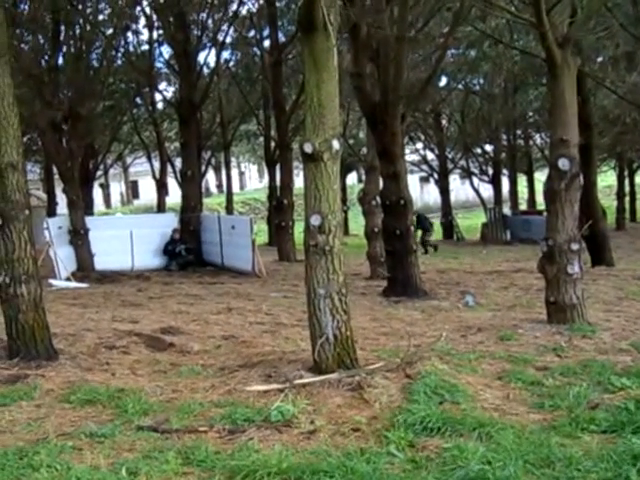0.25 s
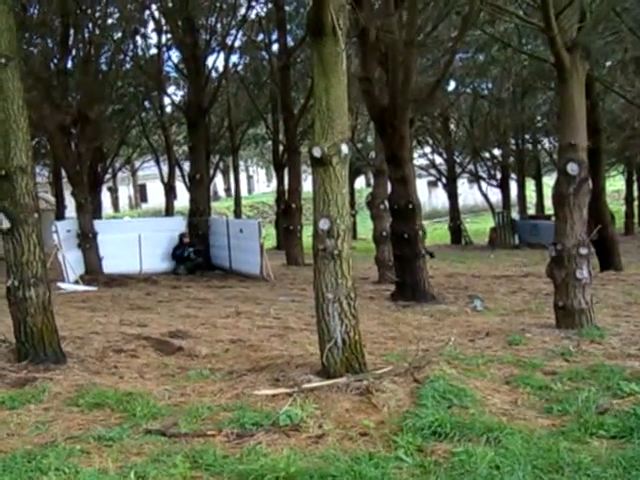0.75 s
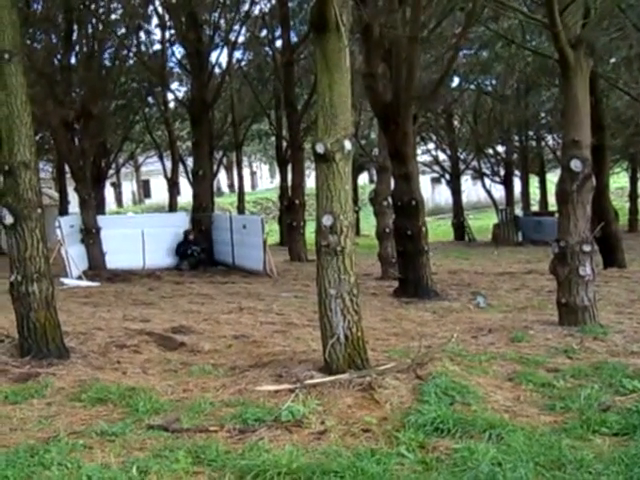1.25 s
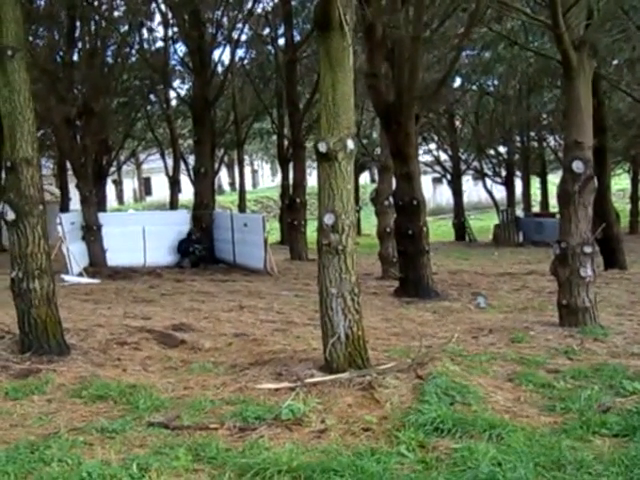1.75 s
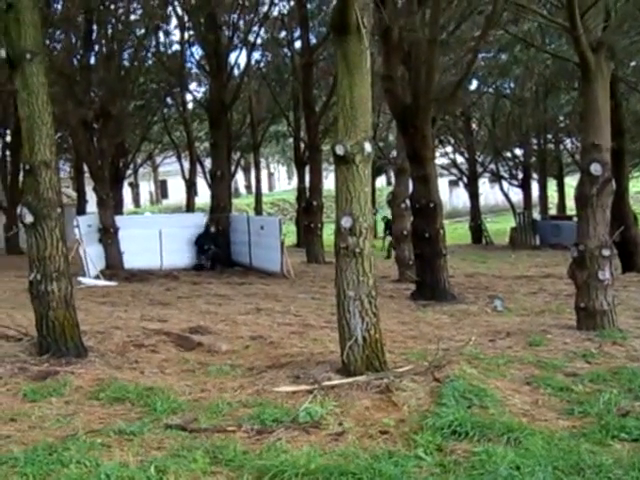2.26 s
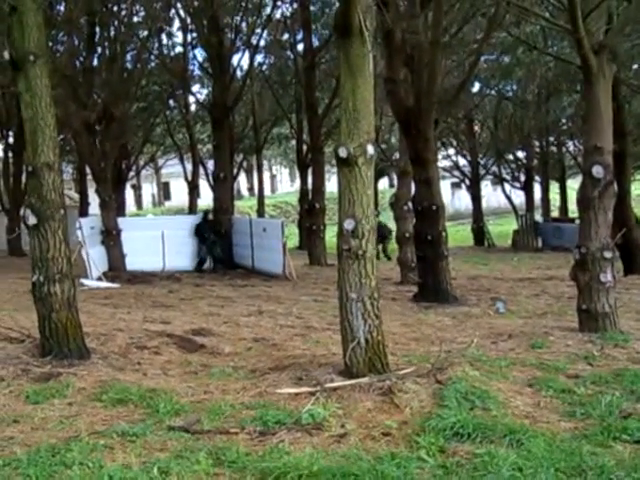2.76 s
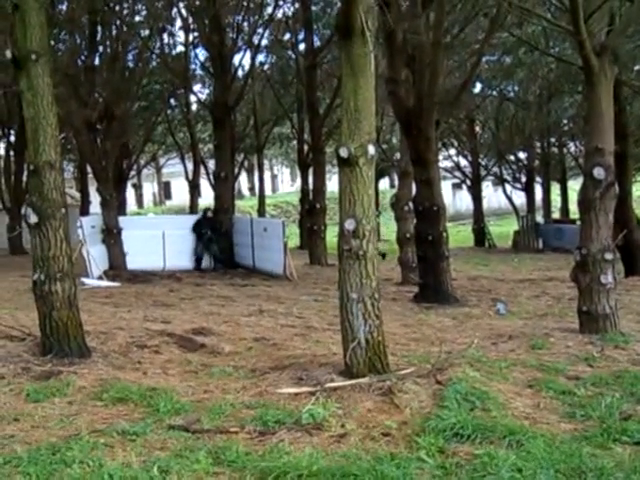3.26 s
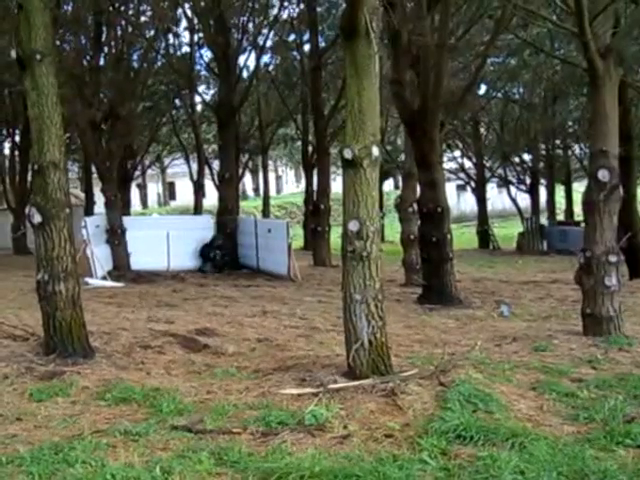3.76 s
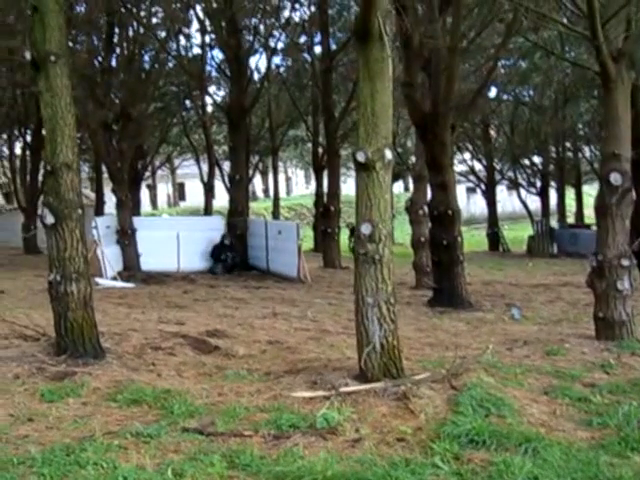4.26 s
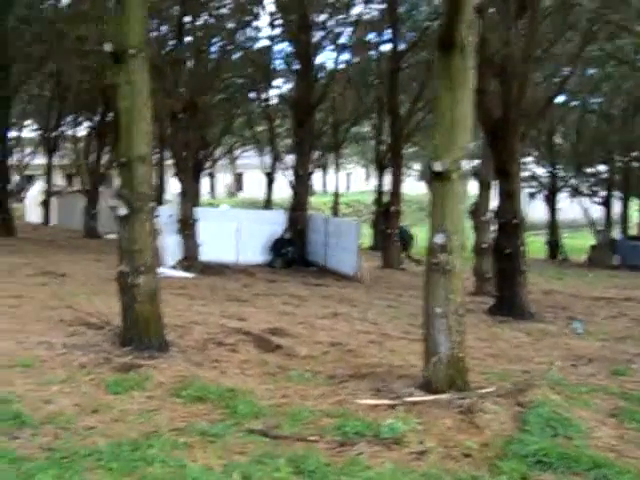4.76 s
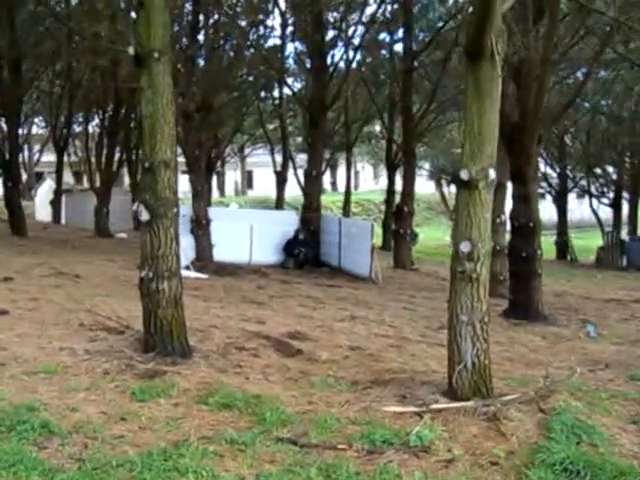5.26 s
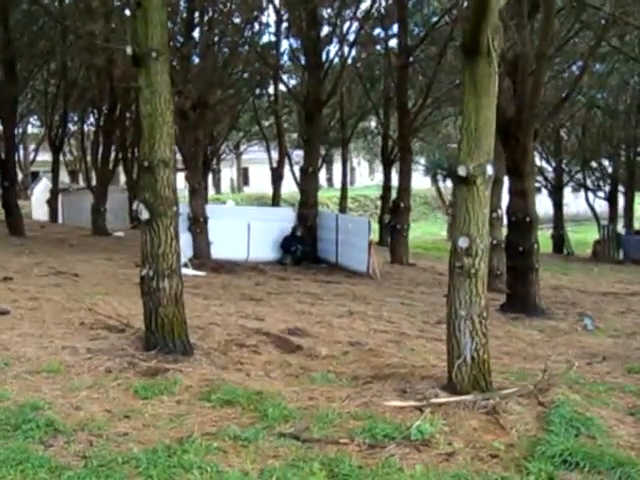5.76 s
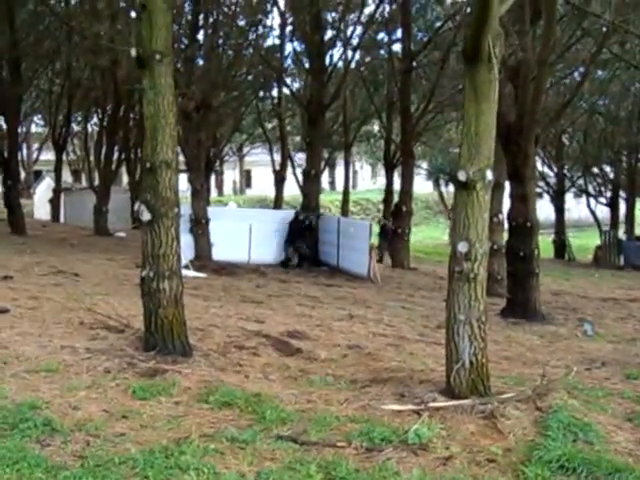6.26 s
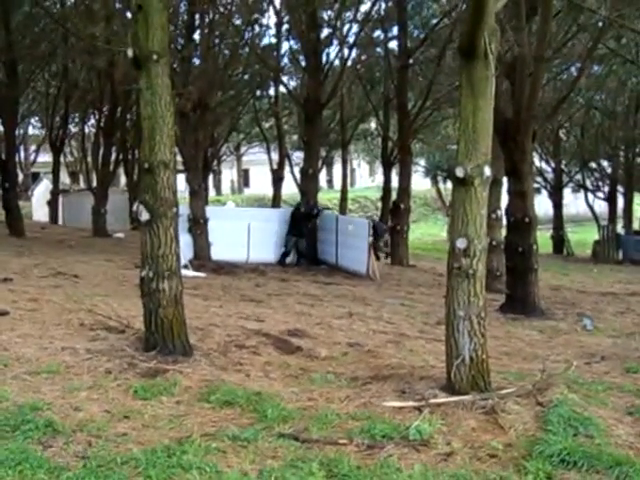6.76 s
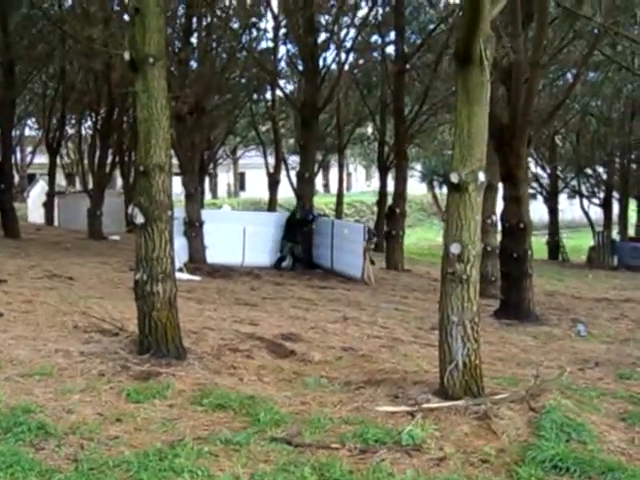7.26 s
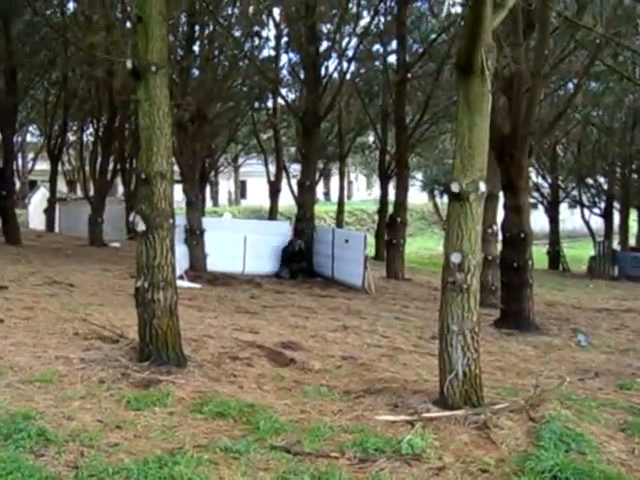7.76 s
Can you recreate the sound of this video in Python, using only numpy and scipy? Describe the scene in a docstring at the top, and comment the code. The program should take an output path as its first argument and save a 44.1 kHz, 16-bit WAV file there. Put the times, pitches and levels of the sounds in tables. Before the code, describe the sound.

Bursts of sharp airsoft pellet cracks strike close by among echoing trees, over heavy wind buffeting, then a nearer gun joins with pops and rasping gearbox.

```python
"""An airsoft skirmish in a pine wood, with gusts buffeting the microphone over a distant hush and a thin whine.
From the start pellets from a far electric gun, about twelve a second in a burst, strike close by: noise
snaps make a crack and a duller clack, thrown back by the trunks. The gun's faint report comes a flight time
before each strike, over a gearbox whirr of grainy noise. The gusts, noise that brightens with level, weaken
midway; late on a nearer gun adds full-bodied pops and a rasping gearbox, and the hush swells and sinks away."""
import sys
import numpy as np
from scipy import signal
from scipy.fft import rfft, irfft, next_fast_len
from scipy.io import wavfile
from scipy.ndimage import uniform_filter1d

SR = 44100
rng = np.random.default_rng(int(sys.argv[2]) if len(sys.argv) > 2 else 0)


def transcribe(u):
    """Save the signal u as a 16-bit wav file named by the first command-line argument.

    u: samples, shape (n,) or (channels, n), limited to [-1, 1]; the rate is SR.
    q: integer samples, one column per channel.
    """
    v = np.clip(np.atleast_2d(u).T, -1, 1)
    q = np.round(v * 32767).astype(np.int16)
    wavfile.write(sys.argv[1], SR, q)


N = 353196
T = np.arange(N) / SR  # seconds

# Pellets striking close by. Each row: time in seconds, crack level in dB over 1 ms, centre of its tone in Hz,
# clack level in dB over 1 ms, lift of the low-mid body in dB.
STRIKES = [(0.0184, -5.5, 5680, -15.5, 12.5), (0.0862, -8, 5740, -55, -5), (0.168, -16.5, 5000, -24, 8),
           (0.3834, -4.5, 5400, -16, 3), (0.9463, -4, 5740, -16, 4), (1.0268, -6.5, 5650, -18.5, 11.5),
           (1.1048, -7.5, 7000, -24, -5), (1.181, -7, 5170, -23, -8), (1.3307, -13, 8430, -22, -3),
           (2.5234, -1, 6520, -13.5, 0.5), (2.609, -3.5, 3830, -20, 7.5), (2.9766, -2.5, 5160, -25, 4.5),
           (3.0697, -9, 7340, -17, -5), (3.1359, -9, 5840, -22.5, 3), (3.34, -5.5, 5800, -18, -4),
           (3.4272, -3.5, 5600, -30, -9), (3.5051, -10, 5100, -19, -1), (3.579, -11, 6640, -17, -32),
           (3.729, -5.5, 6600, -18, 0), (3.969, -8.5, 4600, -9.5, -3), (4.1932, -14.5, 6700, -12.5, 0),
           (4.2871, -11, 4900, -16, -1), (4.3758, -9, 4030, -12.5, -6.5), (4.5832, -9, 5330, -15.5, 0.5),
           (4.67, -10, 4400, -14.5, -8), (4.9876, -4.5, 5280, -29, -11), (5.142, -8, 5230, -41.5, -6),
           (6.921, -5, 6170, -9.5, 8), (7.0062, -8, 6700, -11, 1.5), (7.0909, -6.5, 5100, -10.5, 2.5),
           (7.1776, -5, 5570, -18, -4), (7.2605, -9, 5500, -12, -3), (7.4, -7.5, 5600, -22, 4),
           (7.5022, -10, 5640, -21, -14), (7.5918, -5, 5130, -35, -6), (7.7761, -12, 5270, -28, 2),
           (7.857, -8, 5570, -23, 6.5), (7.9493, -11.5, 4580, -19, 6)]
# Spectrum of a sharp crack. Each row: frequency in Hz, relative density in dB per Hz.
CRACK_TONE = [(150, -23), (400, -1.5), (1000, 1), (1500, -2.5), (2700, 2), (5000, -1), (7000, -1),
              (9000, 1), (11000, -7)]
# Spectrum of a duller clack. Each row: frequency in Hz, relative density in dB per Hz.
CLACK_TONE = [(200, -19.5), (600, -16.5), (1200, -10), (2000, 6.5), (3400, 6), (5000, -4), (9000, -0.5),
              (11000, -18)]
# Runs of the nearer gun's motor. Each row: start in seconds, end in seconds, starting level of the rasp in dB.
MOTOR_RUNS = [(6.582, 7.61, -35.5), (7.763, 8.017, -42.5)]
# Separate gusts, each swelling to a thump and collapsing. Each row: peak time in seconds, swell in seconds,
# peak level in dB before the gains in wind() and thumps().
GUSTS = [(.347, 0.029, -14.5), (.619, 0.08, -14.5), (.922, 0.17, -12), (1.601, 0.018, -19),
         (2.176, 0.045, -16.5), (2.3, 0.1, -16.5), (2.444, .09, -16), (2.925, 0.014, -14.5),
         (5.381, .03, -44.5), (6.013, 0.029, -38), (6.178, .03, -43), (6.63, 0.035, -39.5)]


def undb(db):
    """Decibels to gain."""
    return 10 ** (np.asarray(db) / 20)


def unit(x):
    """Scale to rms 1."""
    return x / np.sqrt(np.mean(x ** 2))


def one_ms(x):
    """Scale to the energy of one millisecond at rms 1."""
    return x * np.sqrt(SR / 1000 / np.sum(x ** 2))


def curve(rows):
    """Read a table of times in seconds and values at every sample."""
    return np.interp(T, *np.transpose(rows))


def spectrum_db(points, hz):
    """Read a spectrum on a log-frequency axis."""
    f, db = np.transpose(points)
    return np.interp(np.log(np.maximum(hz, 1)), np.log(f), db)


def colour(x, points):
    """Give a long noise a spectrum."""
    size = next_fast_len(len(x))
    gain = undb(spectrum_db(points, np.fft.rfftfreq(size, 1 / SR)))
    return irfft(rfft(x, size) * gain, size)[:len(x)]


def walk(rate):
    """Random levels held 1 / rate seconds and smoothed twice; spread near 1."""
    k = max(int(SR / rate), 1)
    held = np.repeat(rng.standard_normal(N // k + 1), k)
    return 1.3 * uniform_filter1d(uniform_filter1d(held, k), k)[:N]


def add(out, s, x):
    """Mix a sound in at a time in seconds."""
    i = max(int(s * SR), 0)
    out[i:i + len(x)] += x[:max(N - i, 0)]


def snap(points, centre_hz, focus_db, rise_ms, fall_ms, body_db=0, ring_db=-30, ring_ms=4.5, size=640):
    """A hard contact: a noise burst, focused around its centre, that swells, dies in milliseconds and rings briefly."""
    body_hz = 1520  # the body lies below this
    ms = np.arange(size) * 1000 / SR
    hz = np.fft.rfftfreq(size, 1 / SR)
    focus = focus_db * np.exp(-2 * np.log2((hz + 1) / centre_hz) ** 2)
    body = body_db / (1 + (hz / body_hz) ** 4)
    gain = undb(spectrum_db(points, hz) + focus + body)
    tone = irfft(rfft(rng.standard_normal(size)) * gain)
    swell = 1 - np.exp(-(ms / rise_ms) ** 2)
    decay = np.exp(-ms / fall_ms) + undb(ring_db) * np.exp(-ms / ring_ms)
    return one_ms(tone * swell * decay)


def firing_times(flight_s=.288, pause_s=.5, first_extra_s=.007):
    """When the far gun is heard: a flight time before each strike; the first pellet after a pause flies longer."""
    landing = np.array(STRIKES)[:, 0]
    first = np.diff(landing, prepend=landing[0]) > pause_s
    fired = landing - flight_s - first_extra_s * first
    return fired[fired > 0]


def gearbox(grain_db=2.5, grain_rate=600, chatter_db=3.5):
    """Gear teeth and piston chatter: a grainy rasp, faint after each far report and strong while the near motor runs."""
    # Spectrum of the rasp. Each row: frequency in Hz, relative density in dB per Hz.
    gear_tone = [(100, -5), (300, -10), (700, 2), (1400, 3), (2700, 2.5), (5000, 1), (7000, -1.5),
                 (9500, -5), (11000, -17.5)]
    whirr_db, whirr_fade_s = -54.5, 0.45
    sag_db_per_s, stop_s = 3, 0.014  # the near rasp eases off through a run, then stops
    rasp = rng.standard_normal(N) * undb(grain_db * walk(grain_rate) + chatter_db * walk(70))
    far_power, near = np.zeros(N), np.zeros(N)
    whirr = undb(whirr_db) * np.exp(-(T[:SR] / whirr_fade_s) ** 2)
    # a burst is already under way as the scene opens
    for s in [0, *firing_times()]:
        add(far_power, s, whirr ** 2)
    for start, end, db in MOTOR_RUNS:
        stop = np.exp(-np.maximum(T - (end - start), 0) / stop_s)
        add(near, start, undb(db - sag_db_per_s * T) * stop)
    return unit(colour(rasp, gear_tone)) * np.sqrt(far_power + near ** 2)


def wind_level(fall_base_s=.02, fall_share=0.24):
    """The breeze with the gusts riding on it, in dB; long gusts also take longer to collapse."""
    # Steady wind on the microphone. Each row: time in seconds, level in dB before the gain in wind().
    breeze = [(0, -23), (.13, -29.5), (.25, -24), (.48, -31.5), (.55, -30.5), (1.0, -22.5), (1.26, -32),
              (1.43, -23), (1.98, -28), (2.07, -31), (2.49, -21), (2.65, -29), (2.8, -22), (3.99, -29),
              (4.08, -35), (4.48, -37.5), (4.73, -49), (5.1, -45.5), (5.53, -58.5), (5.75, -51), (6.8, -43),
              (7.7, -55.5), (8.01, -54.5)]
    power = undb(curve(breeze)) ** 2
    for s, swell_s, db in GUSTS:
        fall_s = fall_base_s + fall_share * swell_s
        shape = np.exp(-np.maximum((s - T) / swell_s, (T - s) / fall_s) ** 2)
        power = power + (undb(db) * shape) ** 2
    return 10 * np.log10(power)


def wind(brighten=0.036, middling_db=-21.5, brightest_db=-18,
         eddy_limit=1.63, eddy_reach=0.25, eddy_db=3.0, eddy_rate=110, gain_db=-2):
    """Turbulence at the microphone: stronger gusts are louder and reach higher, and eddies add quick thumps."""
    # Wind spectrum at a middling gust. Each row: frequency in Hz, relative density in dB per Hz.
    buffet_tone = [(12, -16), (27, 0.5), (60, -2.5), (110, -4), (200, -5), (320, -11), (480, -18),
                   (750, -34.5), (1200, -53), (2400, -87.5)]
    gust_db = wind_level()
    eddies = eddy_limit * np.tanh(walk(eddy_rate) / eddy_limit)
    gust_reach = brighten * (np.minimum(gust_db, brightest_db) - middling_db)
    stretch = np.exp(gust_reach + eddy_reach * eddies)
    size = next_fast_len(N)
    noise, hz = rfft(rng.standard_normal(size)), np.fft.rfftfreq(size, 1 / SR)
    out, power = 0, 0
    # half-octave bands, each following the spectrum as it stretches
    for centre in 16 * 2 ** np.arange(0, 7.5, .5):
        offset = np.clip(2 * np.log2((hz + 1e-9) / centre), -1, 1)
        band = irfft(noise * np.cos(np.pi / 2 * offset) ** 2, size)[:N]
        gain = undb(spectrum_db(buffet_tone, centre / stretch))
        out = out + band * gain
        power = power + np.var(band) * gain ** 2
    return out / np.sqrt(power) * undb(gust_db + gain_db + eddy_db * eddies)


def hush():
    """Far-off noise beyond the trees: coloured noise that slowly rises and falls with a slight waver."""
    # Level of the hush. Each row: time in seconds, level in dB.
    hush_level = [(0, -51), (1.3, -53), (2.5, -46), (5.2, -61.5), (6, -52.5), (6.55, -46.5), (7, -42),
                  (8.01, -71)]
    # Spectrum of the hush. Each row: frequency in Hz, relative density in dB per Hz.
    hush_tone = [(30, 7.5), (100, -3.5), (300, 0), (700, -1), (1100, -7), (1800, -14.5), (3000, -22),
                 (5500, -29.5), (8200, -29), (11000, -35)]
    noise = unit(colour(rng.standard_normal(N), hush_tone))
    return noise * undb(curve(hush_level) + 0.32 * walk(7.1))


def whine(centre_hz=7760, half_width_hz=90, pulses_per_s=25, level_db=-80, order=2):
    """A very faint, thin electronic tone: narrow-band noise, slightly rough and evenly pulsing."""
    edges_hz = [centre_hz - half_width_hz, centre_hz + half_width_hz]
    band = signal.butter(order, edges_hz, "bandpass", fs=SR, output="sos")
    pulse = np.sin(np.pi * pulses_per_s * T) ** 4
    return undb(level_db) * unit(signal.sosfilt(band, rng.standard_normal(N)) * pulse)


def strikes(rattle_db=-7, rattle_ms=10, count=3):
    """Crack, a duller clack and a loose rattle; returns the direct sound and the pulses that enter the wood."""
    # the clack comes later the more it rivals the crack: soonest at lag_range_db below it, latest at equal strength
    clack_soon_ms, clack_late_ms, lag_range_db = 2.1, 4.7, 12
    # echo pulse: a base level before the gain in wood(), plus dB per dB of crack and of clack
    echo_db, echo_per_crack, echo_per_clack = -19, 0.15, 0.25
    direct, sent = np.zeros(N), np.zeros(N)
    for s, crack_db, centre_hz, clack_db, body_db in STRIKES:
        crack = snap(CRACK_TONE, centre_hz, focus_db=10.5, rise_ms=0.69, fall_ms=0.44,
                     body_db=body_db, ring_db=-24.0, ring_ms=3.03)
        add(direct, s, undb(crack_db) * crack)
        lag_ms = np.interp(clack_db - crack_db, [-lag_range_db, 0], [clack_soon_ms, clack_late_ms])
        clack_s = s + lag_ms / 1000
        clack = snap(CLACK_TONE, centre_hz, focus_db=1, rise_ms=0.91, fall_ms=1.2, body_db=body_db)
        add(direct, clack_s, undb(clack_db) * clack)
        # the later a rattle comes, the weaker it is
        for late in rng.uniform(0.16, 1, count):
            knock_hz = centre_hz * rng.uniform(0.28, 1)
            knock = snap(CLACK_TONE, knock_hz, focus_db=-6, rise_ms=0.25, fall_ms=1.0, body_db=body_db)
            add(direct, clack_s + late * rattle_ms / 1000, undb(clack_db + rattle_db - 1.7 * late) * knock)
        add(sent, s, undb([echo_db + echo_per_crack * crack_db + echo_per_clack * clack_db]))
    return np.array([direct, sent])


def trunks(x):
    """A few distinct echoes off the nearest trees: delayed, weaker copies."""
    # Echoes off the nearest trunks. Each row: delay in milliseconds, gain in dB.
    trunk_echoes = [(12, -29.5), (22.6, -27), (26.6, -24.5), (52.5, -41)]
    out = np.zeros(N)
    for ms, db in trunk_echoes:
        add(out, ms / 1000, undb(db) * x)
    return out


def wood(sent, early_t60=0.31, late_t60=1.2, late_db=-10, gain_db=5.5):
    """Scatter from many trunks: a grainy quick decay over a faint long one, drawn anew for each pulse."""
    # Spectrum of the scatter. Each row: frequency in Hz, relative density in dB per Hz.
    wood_tone = [(200, -21), (700, -8.5), (1500, -6), (2400, -2), (3400, 0.5), (5000, 0), (7000, -2),
                 (9000, -4), (11000, -15.5)]
    out, t = np.zeros(N), np.arange(SR) / SR
    tail = undb(-60 * t / early_t60) + undb(late_db - 60 * t / late_t60)
    decay = tail * (1 - np.exp(-t / 0.0017))
    for i in np.flatnonzero(sent):
        # single trunks stand out at first and merge as the paths multiply
        sizes = np.minimum(rng.exponential(size=900), 3.5)
        contrast_db = 1.5 + 2.8 * np.exp(-t / .12)
        patches_db = np.interp(t, np.linspace(0, 1, len(sizes)), sizes) * contrast_db
        scatter = colour(rng.standard_normal(len(t)) * undb(patches_db), wood_tone)
        add(out, i / SR, sent[i] * one_ms(scatter * decay))
    return undb(gain_db) * out


def ricochets(centre_hz=5400, wood_db=-22, scatter_db=3):
    """Thin, dry second cracks, and a faint stray one some time after every strike."""
    # Clicks of pellets glancing off trunks or landing further away.
    # Each row: time in seconds, level in dB over 1 ms.
    glances = [(0.2215, -36), (.247, -32), (1.5775, -44.5), (1.708, -46), (3.6599, -21.5), (4.172, -31),
               (4.928, -39.5), (5.935, -49), (6.6486, -44), (6.737, -29), (7.032, -14.5), (7.272, -18),
               (7.3305, -16.5), (7.414, -7.5), (7.4225, -17), (7.6105, -10), (7.8006, -23), (7.8662, -10)]
    stray_db, stray_soon_s, stray_late_s = -39.5, 0.037, .15
    direct, sent = np.zeros(N), np.zeros(N)
    strays = []
    for s, *_ in STRIKES:
        stray_s = s + rng.uniform(stray_soon_s, stray_late_s)
        strays.append((stray_s, stray_db + scatter_db * rng.standard_normal()))
    for s, db in [*glances, *strays]:
        click = snap(CRACK_TONE, centre_hz, focus_db=15.5, rise_ms=0.23, fall_ms=0.15, body_db=-9, ring_db=-31)
        add(direct, s, undb(db) * click)
    for s, db in glances:
        add(sent, s, undb([db + wood_db]))
    return np.array([direct, sent])


def far_gun(report_db=-31.5, report_hz=3580, wood_db=-9.5, scatter_db=5.1):
    """A light report ahead of each strike, each with its own pitch; being further off, it stirs more echo."""
    direct, sent = np.zeros(N), np.zeros(N)
    for s in firing_times():
        db = report_db + scatter_db * rng.standard_normal()
        centre_hz = report_hz * np.exp(.25 * rng.standard_normal())
        report = snap(CLACK_TONE, centre_hz, focus_db=2.5, rise_ms=0.65, fall_ms=1.3)
        add(direct, s, undb(db) * report)
        add(sent, s, undb([db + wood_db]))
    return np.array([direct, sent])


def thumps(pitch_hz=380, width_ms=4, gain_db=1, soften=0.038, size=1024):
    """At a gust's peak an eddy swings the pressure for a cycle or two; weak gusts tend to swing more slowly."""
    out, t = np.zeros(N), (np.arange(size) - size / 2) / SR
    strongest_db = max(db for *_, db in GUSTS)
    for s, _, db in GUSTS:
        hz = pitch_hz * np.exp(soften * (db - strongest_db)) * rng.uniform(.85, 1.3)
        swing = np.sin(2 * np.pi * (hz * t + rng.random()))
        add(out, s + t[0], undb(db + gain_db) * swing / np.cosh(2000 * t / width_ms))
    return out


def near_gun(centre_hz=3400, wood_db=-9, scatter_db=3):
    """Full-bodied pops, and random clatter of loose parts for as long as the motor runs."""
    # Dull pops of the nearer gun. Each row: time in seconds, level in dB over 1 ms.
    pops = [(6.592, -16), (6.7103, -16.5), (6.7964, -17.5), (6.8756, -14), (7.7637, -23)]
    clatter_per_s, clatter_over_rasp_db = 16, 10.5  # level above the rasp's starting level
    direct, sent = np.zeros(N), np.zeros(N)
    for s, db in pops:
        pop = snap(CLACK_TONE, centre_hz, focus_db=1.5, rise_ms=0.29, fall_ms=3.1, body_db=18)
        add(direct, s, undb(db) * pop)
        add(sent, s, undb([db + wood_db]))
    for start, end, db in MOTOR_RUNS:
        for s in rng.uniform(start, end, int((end - start) * clatter_per_s)):
            click = snap(CLACK_TONE, centre_hz, focus_db=8.0, rise_ms=0.35, fall_ms=0.89)
            click_db = db + clatter_over_rasp_db + scatter_db * rng.standard_normal()
            add(direct, s, undb(click_db) * click)
    return np.array([direct, sent])


def scene(notch_hz=7740, notch_q=16):
    """Guns and pellets with their echoes, the gearboxes, wind and distance."""
    direct, sent = strikes() + ricochets() + far_gun() + near_gun()
    guns = direct + trunks(direct) + wood(sent) + gearbox()
    # the treble of the guns has one narrow hollow
    guns = signal.lfilter(*signal.iirnotch(notch_hz, notch_q, fs=SR), guns)
    return (guns + wind() + thumps() + hush() + whine())[None]


def record(dry, ceiling=1.0, top_hz=10900):
    """The recorder rounds the loudest cracks and cuts the top."""
    rounded = ceiling * np.tanh(dry / ceiling)
    return signal.sosfilt(signal.ellip(10, .2, 70, top_hz, fs=SR, output="sos"), rounded)


dry = scene()
out = record(dry)
transcribe(out)
```